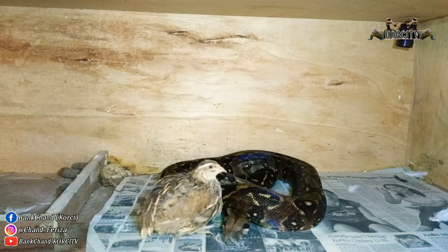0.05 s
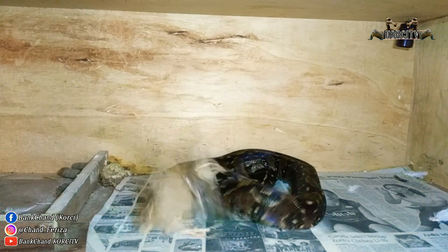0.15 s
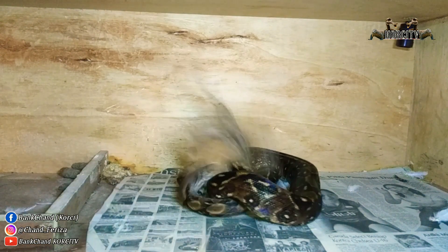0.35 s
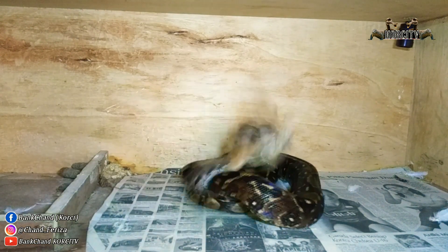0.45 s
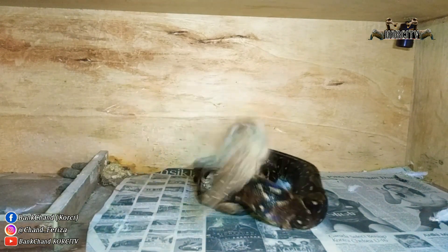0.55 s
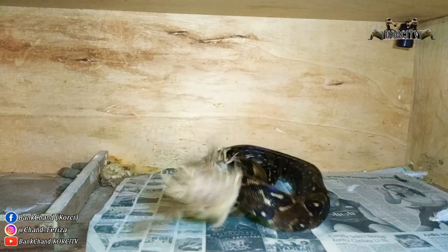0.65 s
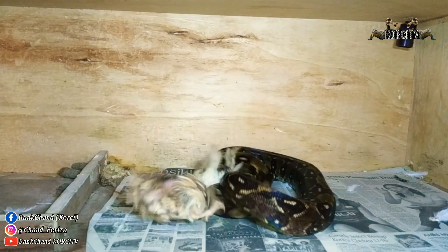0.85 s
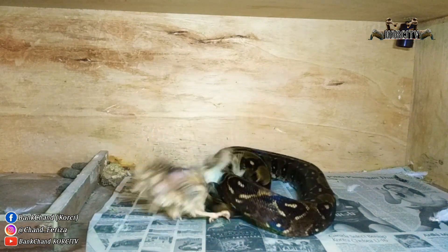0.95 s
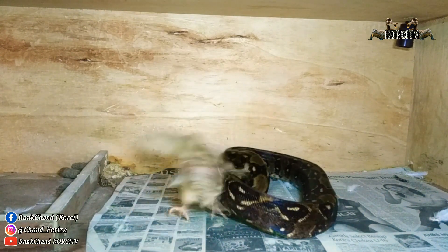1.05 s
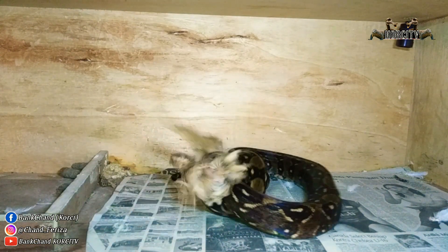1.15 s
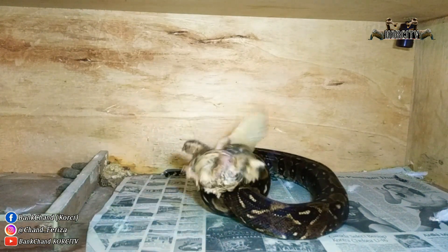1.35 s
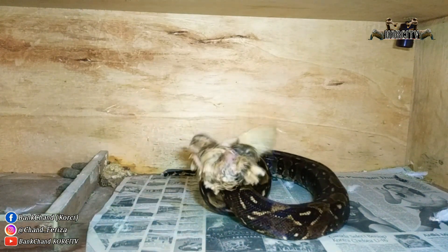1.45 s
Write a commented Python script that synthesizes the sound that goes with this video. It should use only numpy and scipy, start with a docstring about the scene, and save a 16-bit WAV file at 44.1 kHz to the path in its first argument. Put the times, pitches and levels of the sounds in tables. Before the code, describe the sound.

Flapping wings, paper rustling and hollow thuds as a snake seizes a bird inside a box.

```python
"""Snake seizing a quail

On newspaper in a plywood box, the bird is flung up, beats its wings and slaps down hard,
then scuffles more weakly in the coils. Paper crackles, claws squeak, feet and beak knock,
wings push air and bodies thud on the boards. Sharp contacts echo briefly off the walls."""
import sys
import numpy as np
from scipy import signal
from scipy.fft import rfft, irfft
from scipy.io import wavfile
from scipy.ndimage import uniform_filter1d

SR = 44100
rng = np.random.default_rng(int(sys.argv[2]) if len(sys.argv) > 2 else 0)


def dump(signal):
    """Clip the signal to [-1, 1] and save it as 16-bit WAV at the path in sys.argv[1]."""
    limited = np.clip(np.atleast_2d(signal).T, -1, 1)
    pcm = np.round(limited * 32767).astype(np.int16)
    wavfile.write(sys.argv[1], SR, pcm)


N = 66150

# room noise spectrum: freq_hz, gain_db
ROOM_COLOUR = [(20, -32), (42, -7), (65, 7.5), (110, -23.5), (170, 4), (230, -15.5), (330, -10),
               (800, -14.5), (2500, -32), (15000, -47)]
# air pushed by the wings: time_s, level_db
WING_AIR_LEVEL = [(0, -41), (.21, -54), (.27, -30), (.34, -31.5), (.41, -35.5), (.48, -27), (.62, -31.5),
                  (.72, -43.5), (.85, -42.5), (.95, -45), (1.06, -40.5), (1.2, -48.5), (1.4, -47),
                  (1.5, -54)]
# wing air spectrum: freq_hz, gain_db
WING_AIR_COLOUR = [(20, -54), (45, -46.5), (62, -1.5), (90, -2), (135, -12), (170, -6), (230, -14.5),
                   (300, -12.5), (600, -27), (1200, -25), (15000, -105)]
# air pulses of the lunge and wing strokes: centre_s, level_db, pitch_hz
AIR_PULSES = [(.233, -23, 141), (0.295, -25.5, 94), (0.329, -31, 94), (0.392, -20, 90), (0.601, -26, 92),
              (0.681, -26, 158), (0.851, -31, 112), (1.076, -38, 90)]
# feathers and coils rubbing on paper: time_s, level_db
RUSTLE_LEVEL = [(.1, -58.5), (.13, -53), (.19, -48.5), (.23, -38.5), (.32, -30), (.39, -40.5), (.46, -47),
                (.53, -41), (.62, -28), (.7, -35.5), (.82, -43), (.95, -40.5), (1.06, -45.5), (1.29, -49.5),
                (1.35, -44), (1.42, -54.5), (1.5, -59)]
# rubbing spectrum: freq_hz, gain_db
RUSTLE_COLOUR = [(100, -25), (500, 2.5), (1400, -1), (2500, 0.5), (4200, -3), (6000, -3.5), (8400, -7.5),
                 (11000, -7), (15000, -10.5)]
# claws sliding on paper: centre_s, level_db, pitch_hz
CLAW_SQUEAKS = [(1.081, -49, 2470), (1.124, -44.5, 1448), (1.205, -50.5, 4430)]
# feathers and scales crumpling paper: start_s, level_db, decay_s
PAPER_SWIPES = [(.209, -27, 0.01), (.256, -18.5, 0.02), (.270, -13, 0.011), (.285, -20.5, 0.0018),
                (.337, -19, 0.004), (.733, -25.5, 0.0083), (.773, -24.5, 0.036), (1.02, -34.5, 0.00099),
                (1.124, -39, 0.0066), (1.154, -33, 0.0016), (1.199, -34, 0.0046), (1.34, -46, .015)]
# crumpling spectrum: freq_hz, gain_db
SWIPE_COLOUR = [(100, -8), (500, -0.5), (1400, 2.5), (2500, -3.5), (4200, -0.5), (6000, 0), (8400, 0.5),
                (11000, -0.5), (15000, -3.5)]
# feet and beak on the boards: start_s, level_db, decay_s, pitch_hz
BOARD_KNOCKS = [(.338, -21.5, 0.017, 1440), (0.475, -15.5, 0.0055, 2510), (.532, -33, 0.0033, 2000),
                (.868, -35.5, 0.0018, 1540), (1.021, -31, 0.0013, 1070), (1.156, -36, .002, 1080),
                (1.2, -32, 0.0042, 3600)]
# knock spectrum: pitch_ratio, gain_db
KNOCK_COLOUR = [(.05, -14), (.4, 4.5), (1, 7), (1.5, -4), (2.3, -12.5), (8, -27)]
# bodies landing: start_s, level_db, contact_s, drag_db
LANDINGS = [(0.203, -2.5, 0.0024, -28), (0.23, -10.5, 0.0013, -26.5), (0.293, -17.5, 0.00078, -31),
            (0.342, -14, 0.0044, -33.5), (0.425, 1, 0.0036, -38), (0.477, -3.5, 0.0011, -25.5),
            (0.501, -18, 0.0017, -27.5), (0.551, -2, 0.00049, -24), (0.672, -7.5, 0.00063, -27),
            (0.72, -6.5, 0.0029, -45), (1.021, -19.5, 0.00055, -58), (1.153, -20, 0.00075, -44)]
# drag spectrum: freq_hz, gain_db
DRAG_COLOUR = [(40, -36), (120, -5), (230, -8), (400, 5), (750, -1), (1200, -14.5), (4000, -37.5),
               (15000, -52)]
# bird slapping down: start_s, level_db, decay_s
BIRD_SLAPS = [(.548, -6, 0.00087), (.5505, -5.5, 0.0078), (.557, -2.5, 0.003), (.5595, -5.5, 0.00072)]
# slap spectrum: freq_hz, gain_db
SLAP_COLOUR = [(100, -11.5), (400, -10), (800, -1.5), (1100, 1.5), (1800, -0.5), (4200, 0), (6000, 2.5),
               (8400, 1), (11000, -2.5), (15000, -11)]
# low plywood modes: freq_hz, level_db, t60_s
BOARD_MODES = [(65, -38, 0.21), (88, -32.5, 0.16), (112, -25, 0.13), (170.3, -26.5, 0.29),
               (290.6, -24.5, 0.21), (334.5, -30, 0.26), (396.2, -29.5, 0.36), (483, -31.5, 0.1),
               (665.5, -23.5, 0.1)]
# narrow wall resonances: freq_hz, width_hz, gain_db
PANEL_PEAKS = [(674, 46, 11.5), (1373, 170, 0), (2240, 340, -8), (4180, 50, 4)]
# echo decay in the box: freq_hz, t60_s
BOX_DECAY = [(100, 0.4), (500, 0.62), (2000, 0.28), (5000, 0.32), (8500, 0.34), (15000, 0.24)]
# left-right likeness: freq_hz, correlation
STEREO_LIKENESS = [(50, 1), (150, 0.85), (350, 0.81), (700, 0.51), (1400, 0), (15000, 0.1)]
# left microphone port: freq_hz, gain_db
LEFT_PORT_COLOUR = [(1000, -2.5), (4500, 2), (6300, 0), (7600, 5.5), (8600, 7.5), (9500, 1), (12000, -2.5),
                    (15000, -1)]
# right microphone port: freq_hz, gain_db
RIGHT_PORT_COLOUR = [(1000, -2.5), (4500, 2), (6300, -6.5), (7600, -6), (8600, -10), (9500, -12.5),
                     (12000, -9.5), (15000, -1.5)]


def amp(db):
    return 10 ** (np.asarray(db) / 20)


def unit_rms(x):
    return x / np.sqrt(np.mean(x ** 2) + 1e-20)


def at_hz(points, hz):
    freq_hz, value = np.transpose(points)
    return np.interp(np.log(hz + 1), np.log(freq_hz + 1), value)


def envelope(points):
    return amp(np.interp(np.arange(N) / SR, *np.transpose(points)))


def add(mix, start_s, sound):
    part = mix[max(round(start_s * SR), 0):][:len(sound)]
    part += sound[:len(part)]


def colour(x, points, keep_power=True, size=8192):
    """Minimum-phase filter; keep_power holds the power of white noise."""
    log_gain = np.log(amp(at_hz(points, abs(np.fft.fftfreq(size, 1 / SR)))))
    taps = irfft(np.exp(np.conj(signal.hilbert(log_gain)))[:size // 2 + 1])[:size // 2]
    return signal.fftconvolve(x, taps / (np.linalg.norm(taps) if keep_power else 1))[:N]


def stereo(a, b):
    """Two unrelated signals to left and right, alike in the bass."""
    likeness = np.clip(at_hz(STEREO_LIKENESS, np.fft.rfftfreq(len(a), 1 / SR)), -1, 1)
    mid = rfft(a) * np.sqrt((1 + likeness) / 2)
    side = rfft(b) * np.sqrt((1 - likeness) / 2)
    return irfft(np.array([mid + side, mid - side]), len(a))


def whiten(x, smooth_hz=120):
    size = 2 * x.shape[-1]
    spectrum = rfft(x, size)
    power = uniform_filter1d(abs(spectrum) ** 2, max(round(smooth_hz * size / SR), 1))
    return irfft(spectrum / np.sqrt(abs(power) + 1e-12), size)[..., :x.shape[-1]]


def bursts(rows, rise_s):
    """Clusters of tiny snaps, as pitchless decaying noise."""
    out, t = np.zeros(N), np.arange(SR // 6) / SR
    for start_s, db, decay_s in rows:
        burst = whiten(rng.standard_normal(len(t)) * (1 - np.exp(-t / rise_s)) * np.exp(-t / decay_s))
        add(out, start_s, 4 * amp(db) * burst / np.linalg.norm(burst))
    return out


def room_noise(level_db=-49.5):
    """Quiet, steady, mostly bass."""
    sides = [unit_rms(colour(rng.standard_normal(N), ROOM_COLOUR)) for _ in range(2)]
    return amp(level_db) * stereo(*sides)


def box(x, direct_db=-1, early_db=4, tail_db=-0.5, early_decay_s=0.0051, tail_rise_s=0.0081):
    """Direct sound, dense echoes off the near walls, short tail."""
    t = np.arange(SR * 3 // 4) / SR
    shape = (2, len(t))
    reflections = rng.standard_normal(shape) * (rng.random(shape) < 0.1)
    early = whiten(reflections * np.exp(-t / early_decay_s))
    hz, frame_s, spectra = signal.stft(rng.standard_normal(shape), SR, nperseg=256)
    spectra *= amp(-60 * frame_s / at_hz(BOX_DECAY, hz)[:, None])
    tail = signal.istft(spectra, SR, nperseg=256)[1][:, :len(t)] * (1 - np.exp(-t / tail_rise_s))
    echoes = (amp(early_db) * unit_rms(early) + amp(tail_db) * unit_rms(tail)) / np.sqrt(len(t))
    return amp(direct_db) * x + stereo(*signal.fftconvolve(x[None], echoes, axes=1)[:, :N])


def board_ring(contact_s):
    """Boards after one blow; longer contact leaves only the low modes."""
    t = np.arange(SR // 2) / SR
    modes = [amp(db - 60 * t / t60_s) * np.sin(2 * np.pi * hz * t) / (1 + (hz * contact_s) ** 2)
             for hz, db, t60_s in BOARD_MODES]
    return sum(modes) * (1 - np.exp(-t / contact_s))


def panel_ring(x):
    """Plywood walls ring on at a few pitches."""
    return x + sum(amp(db) * signal.lfilter(*signal.iirpeak(hz, hz / width_hz, SR), x)
                   for hz, width_hz, db in PANEL_PEAKS)


def wing_air(boom_db=-7.5):
    """Low buffeting; part of it booms in the board modes."""
    air = stereo(*[unit_rms(colour(rng.standard_normal(N), WING_AIR_COLOUR)) for _ in range(2)])
    drive = rng.standard_normal(N + SR // 2)
    boom = unit_rms(signal.fftconvolve(drive, board_ring(contact_s=0.0079), "valid")[:N])
    return unit_rms(air + amp(boom_db) * boom) * envelope(WING_AIR_LEVEL)


def whumps(half_width_s=0.0084):
    """A sweep of body or wing gives a brief low pressure swell."""
    t = np.arange(N) / SR
    return sum(amp(db) * np.exp(-((t - at_s) / half_width_s) ** 2) * np.sin(2 * np.pi * hz * (at_s - t))
               for at_s, db, hz in AIR_PULSES)


def rustle(gain_db=-1.5, grains_per_s=20000, spread_db=2.4, flutter_db=1.67, flutter_s=0.0074):
    """Dense friction grains on paper, in uneven clumps."""
    sizes = amp(spread_db * np.minimum(rng.exponential(1, (2, N)), 5)) * rng.choice([-1, 1], (2, N))
    flutter = unit_rms(uniform_filter1d(rng.standard_normal(N), round(flutter_s * SR)))
    hits = rng.random((2, N)) < grains_per_s / SR
    grains = unit_rms(sizes * hits * amp(flutter_db * flutter)) * envelope(RUSTLE_LEVEL)
    return amp(gain_db) * stereo(*[colour(side, RUSTLE_COLOUR) for side in grains])


def squeaks(half_width_s=0.0077, sag_per_s=3, jitter_hz=283):
    """A claw sticks and slips: a short rough tone that sags as it slows."""
    out = np.zeros(N)
    for centre_s, db, hz in CLAW_SQUEAKS:
        t = np.arange(N) / SR - centre_s
        tremble = unit_rms(uniform_filter1d(rng.standard_normal(N), size=48))
        pitch_hz = hz * (1 - sag_per_s * t) + jitter_hz * tremble
        out += amp(db) * np.exp(-(t / half_width_s) ** 2) * np.sin(2 * np.pi * np.cumsum(pitch_hz) / SR)
    return out


def drags(gain_db=12, decay_s=0.024):
    """Dull scrape of a body at each landing."""
    rows = [(start_s, drag_db, decay_s) for start_s, _, _, drag_db in LANDINGS]
    return amp(gain_db) * stereo(*[colour(bursts(rows, rise_s=0.00064), DRAG_COLOUR) for _ in range(2)])


def swipes():
    """Feathers and scales crumple the paper."""
    return colour(bursts(PAPER_SWIPES, rise_s=0.00047), SWIPE_COLOUR)


def knocks():
    """Feet and beak clack on the boards, each hit around its own pitch."""
    out = np.zeros(N)
    for start_s, db, decay_s, pitch_hz in BOARD_KNOCKS:
        spectrum = [(pitch_hz * ratio, gain_db) for ratio, gain_db in KNOCK_COLOUR]
        out += colour(bursts([(start_s, db, decay_s)], rise_s=0.00022), spectrum)
    return out


def thuds():
    """Landing bodies ring the boards."""
    out = np.zeros(N)
    for start_s, db, contact_s, _ in LANDINGS:
        add(out, start_s, amp(db) * board_ring(contact_s))
    return out


def slaps():
    """The bird hits the paper hard and rings the walls."""
    return panel_ring(colour(bursts(BIRD_SLAPS, rise_s=0.0001), SLAP_COLOUR))


def scene():
    """Each kind of sharp contact has its own spot in the box, so its own echoes."""
    slap, swipe = slaps(), swipes()
    contacts = box(slap) + box(knocks()) + box(swipe) + box(squeaks())
    return contacts + rustle() + thuds() + drags() + whumps() + wing_air() + room_noise()


def record(dry):
    """Microphone port colour, peak clipping, band limit."""
    left = colour(dry[0], LEFT_PORT_COLOUR, keep_power=False)
    right = colour(dry[1], RIGHT_PORT_COLOUR, keep_power=False)
    lowpass = signal.firwin(401, cutoff=15500, window=("kaiser", 8), fs=SR)
    return signal.oaconvolve(np.clip([left, right], -1, 1), lowpass[None], "same")


dry = scene()
out = record(dry)
dump(out)
```